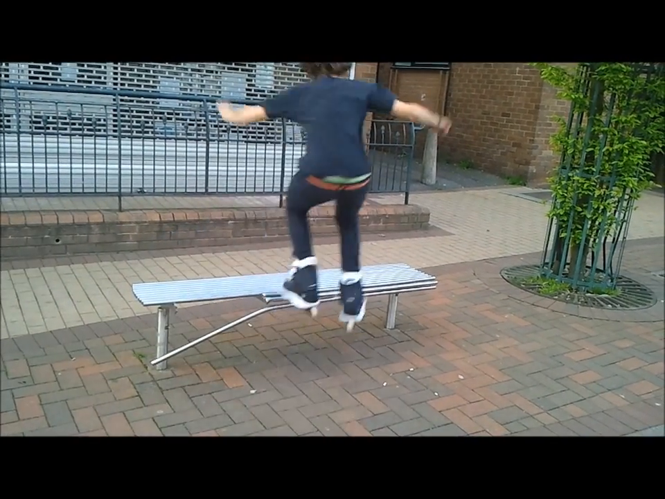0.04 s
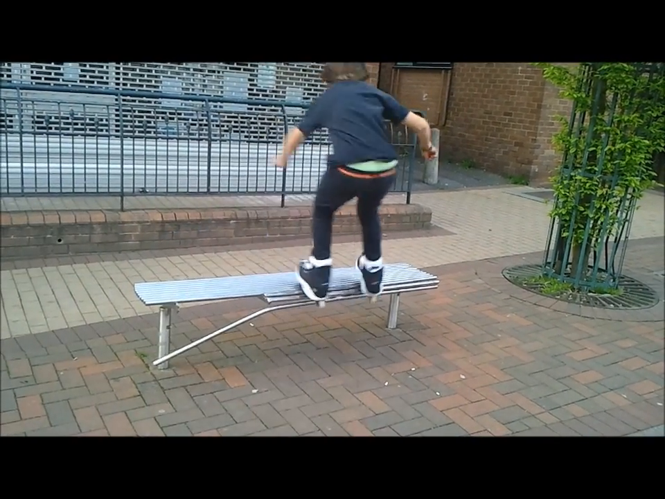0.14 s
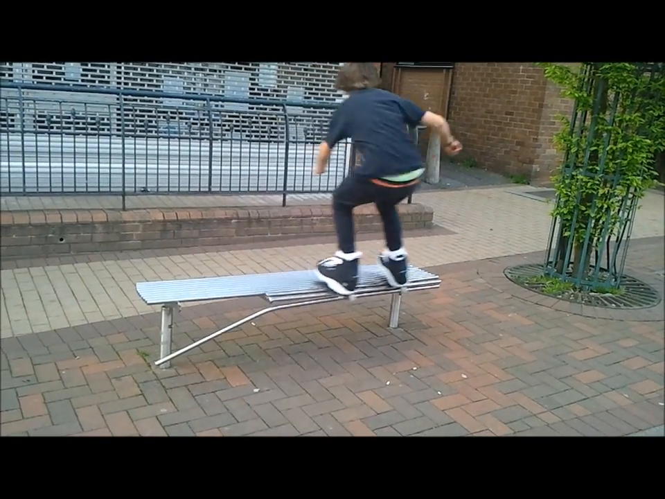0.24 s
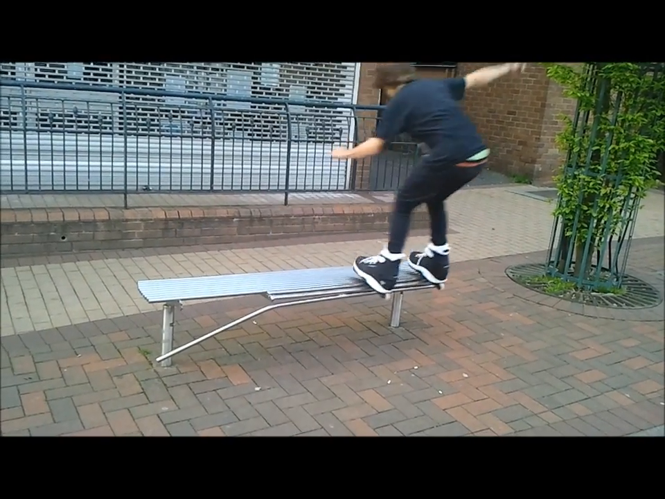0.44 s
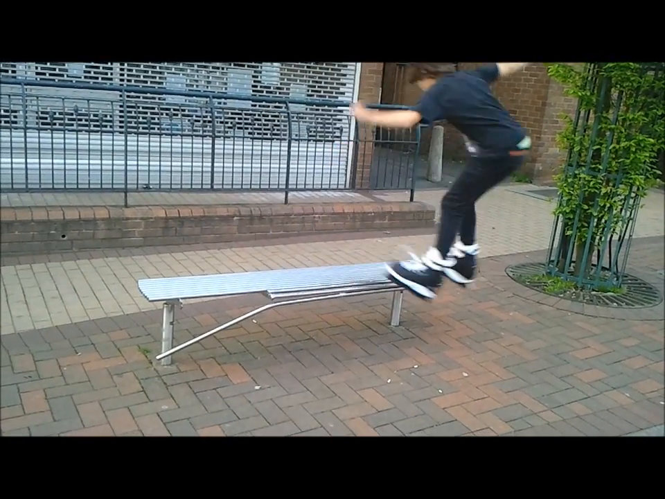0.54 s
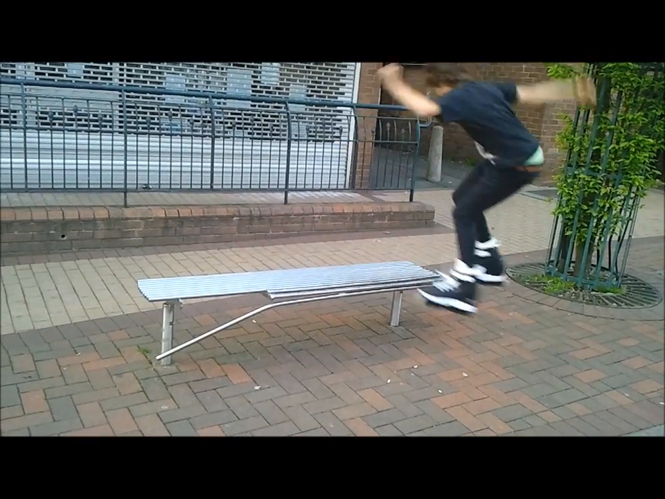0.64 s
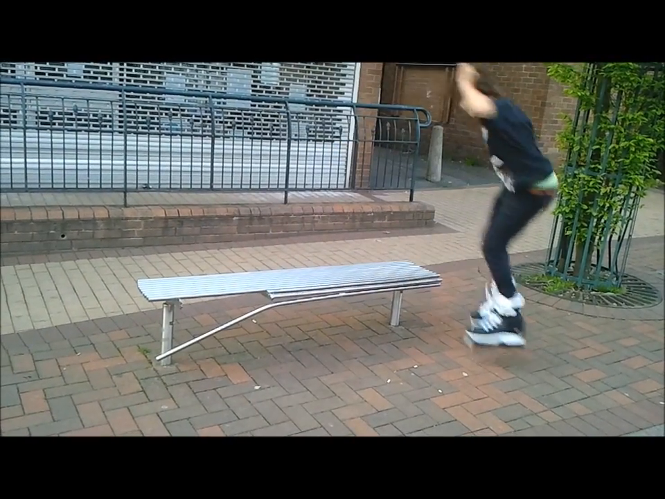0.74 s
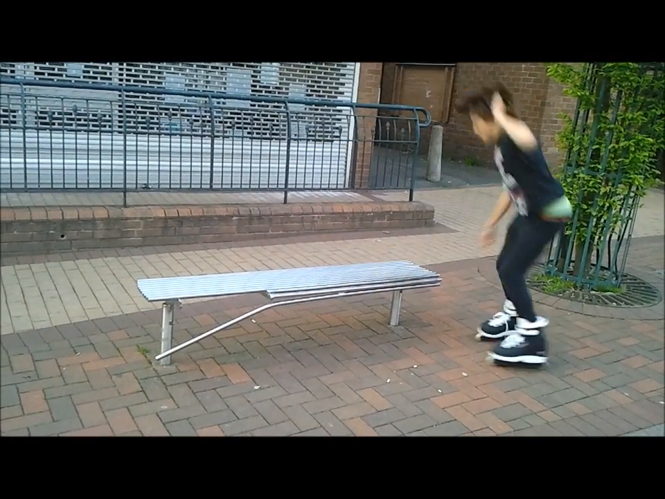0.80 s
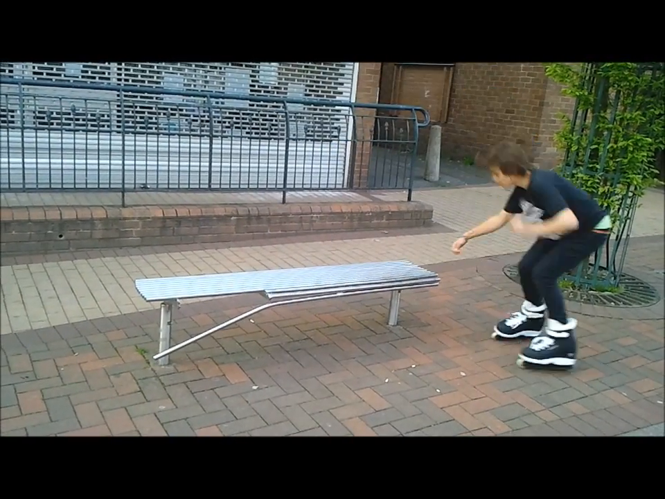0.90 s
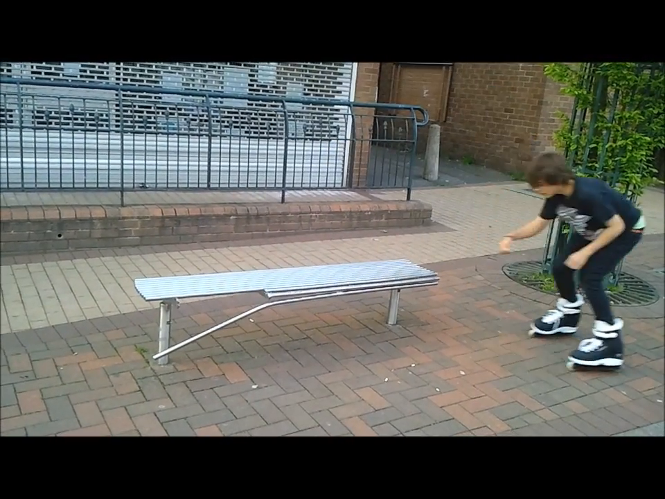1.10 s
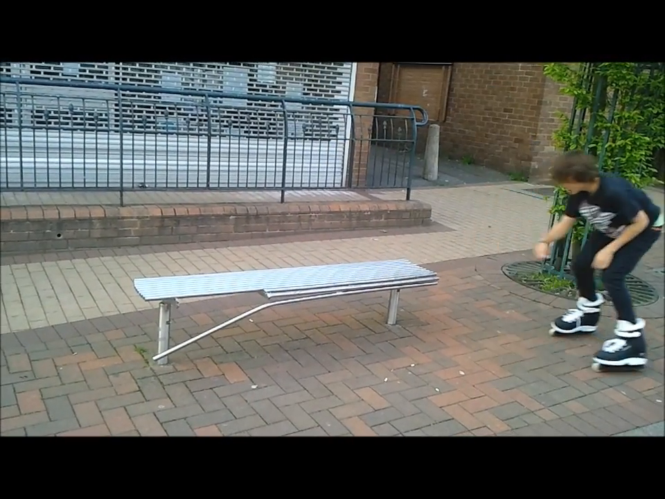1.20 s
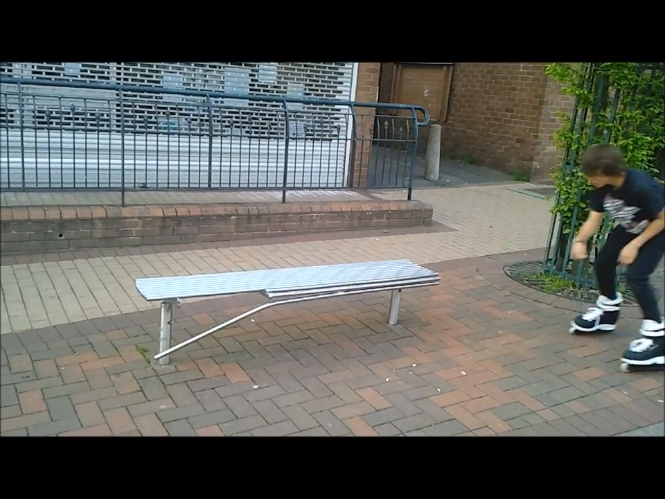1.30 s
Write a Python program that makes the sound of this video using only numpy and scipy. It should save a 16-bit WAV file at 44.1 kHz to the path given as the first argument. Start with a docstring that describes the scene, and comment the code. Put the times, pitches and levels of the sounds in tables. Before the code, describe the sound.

An inline skate grind on a metal bench in a brick yard: faint clicks, a loud ringing clank, a fading scrape, then quick landing thuds and rolling wheels. The blows echo briefly and slightly distort the microphone.

```python
"""An inline skater pushes off with a brief low drone; loose skate parts click in flight.
Both frames slam onto a metal bench and scrape along it by stick-slip; the seat rings and shudders.
Amid soft low bumps the frames snap off its end. The skates land on brick paving in a quick run of
thuds and roll away. Throughout, brick walls echo the blows and scrapes, and the loudest peaks
overload a small microphone."""
import sys
import numpy as np
from scipy import signal
from scipy.fft import rfft, irfft
from scipy.io import wavfile

SR = 44100
rng = np.random.default_rng(int(sys.argv[2]) if len(sys.argv) > 2 else 0)


def generate_wav(sig):
    """Save sig (samples, or channels by samples) to the path in sys.argv[1] as 16-bit PCM at SR."""
    pcm = np.round(np.clip(np.atleast_2d(sig).T, -1, 1) * 32767).astype(np.int16)
    wavfile.write(sys.argv[1], SR, pcm)


N = 59535
T = np.arange(N) / SR

# wheel roar spectrum: freq_hz, gain_db
ROLL_SPECTRUM = [(30, -13.5), (60, -14.5), (110, -6.5), (160, -7), (195, 5), (230, -4.5), (300, 1),
                 (450, -7), (700, -7), (1050, -4.5), (1650, -8), (2150, -21), (3100, -16), (4500, -30.5),
                 (6300, -35.5), (8000, -50.5)]
# wheels on brick, with the yard behind them: time_s, level_db
ROLL_ENVELOPE = [(0, -31), (.2, -35), (.5, -33.5), (.8, -31), (.97, -30), (1.1, -33), (1.22, -33.5),
                 (1.35, -34.5)]
# skate clicks in flight: start_s, level_db
TICK_HITS = [(.030, -29), (.110, -30.5), (.129, -31), (.165, -29)]
# click and snap spectrum: freq_hz, gain_db
SNAP_SPECTRUM = [(100, -18), (650, -14.5), (1150, 2), (1800, -2.5), (2350, 7), (3000, -14), (3700, -9),
                 (4800, -17), (6100, -8), (8000, -24.5)]
# frames striking the seat: start_s, crack_db, knock_db, ring_db, pitch_hz, second_pitch_hz
FRAME_HITS = [(.2211, -6, 1.5, -15.5, 1442, 1915), (.2230, -3, 4, -16, 2334, 2635),
              (0.2344, -15.5, -4, -27, 1470, 2370), (.240, -23, -1, -30.5, 2366, 2435),
              (0.2478, -4.5, 1.5, -19.5, 2733, 3345), (0.265, -15, -6.5, -31, 2570, 1550),
              (0.271, -15, -4.5, -37, 2400, 1200), (0.322, -23, -12.5, -45, 2290, 1193),
              (0.3986, -19, -6.5, -29.5, 1870, 3370)]
# frame crack spectrum: freq_hz, gain_db
FRAME_SPECTRUM = [(80, -27.5), (330, -11.5), (600, -14), (1000, -5), (1450, 1), (1850, -5.5), (2450, -5),
                  (3300, -8.5), (4800, -26.5), (6500, -15), (8000, -45.5)]
# clearest seat modes: pitch_hz, relative_db, unscaled_t60_s
SEAT_MODES = [(255, -9, .8), (386, -6, .6), (585, -9, .6), (836, -9, .6), (1108, -3, .7), (1215, 1, .7),
              (1303, -3, .65), (1445, -2, .6), (1476, -2, .6), (2311, -2, .6), (2348, -3, .55),
              (2545, 0, .65), (2723, -1, .6), (6560, -12, .4)]
# seat plate spectrum: freq_hz, gain_db
PLATE_SPECTRUM = [(80, -15.5), (320, 0), (550, -6), (900, -4.5), (1350, -0.5), (1900, -4), (2500, -2.5),
                  (3400, -3.5), (4300, -10.5), (5300, -21.5), (6500, -20), (8000, -33)]
# metallic zing of the scraping frames: pitch_hz, width_hz, relative_db
ZING_BANDS = [(1150, 90, -11), (2440, 350, -7.5), (6130, 490, -13.5)]
# dull low bumps: start_s, relative_db, pitch_hz
BUMP_HITS = [(0.663, -27, 150), (0.693, -28, 176), (.722, -25, 280), (0.7426, -23, 138), (0.752, -26, 285),
             (.797, -25, 131), (0.8157, -21.5, 95), (0.8187, -17.5, 219), (0.847, -27.5, 130),
             (.855, -19.5, 119)]
# trailing frame's scrape spectrum: freq_hz, gain_db
TRAIL_SPECTRUM = [(100, -15.5), (600, -4), (1150, -1), (1600, 4.5), (2000, -10.5), (2400, -11), (3700, -4),
                  (4600, -26.5), (6000, -22.5), (8000, -42.5)]
# boots and wheels meeting brick: start_s, thud_relative_db, thud_hz, clack_relative_db
LANDING_HITS = [(.870, -9.5, 190, -15), (0.8786, 0.5, 310, -12.5), (0.8832, -9, 240, -14.5),
                (.890, -6.5, 410, -9), (0.8932, -1.5, 284, -15), (0.8973, -11.5, 290, -14),
                (.914, -11.5, 377, -17.5), (.921, -13, 328, -19.5), (.941, -30, 330, -19),
                (.956, -29, 370, -21.5), (0.989, -35, 320, -25.5), (1.071, -24, 280, -49)]
# wheel clack spectrum: freq_hz, gain_db
CLACK_SPECTRUM = [(80, -8.5), (300, 1), (600, 1), (1100, -3), (1650, 1), (2200, -8), (3300, -6.5),
                  (4500, -13.5), (5600, -14), (8000, -34)]
# wall echoes: delay_s, level_db
WALL_ECHOES = [(.014, -15.5), (0.031, -11.5), (.061, -18.5)]

SLIDE_START_S, RELEASE_S = .228, .6893


def amp(db):
    """Decibels to gain."""
    return 10 ** (np.asarray(db) / 20)


def unit(x):
    """Scale to rms 1."""
    return x / np.sqrt(np.mean(x ** 2))


def convolve(x, response):
    """Play x through a response."""
    return signal.fftconvolve(x, response)[:N]


def delay(x, start_s):
    """Start x at start_s."""
    return np.interp(T - start_s, T, x, left=0)


def decay(t60_s):
    """Envelope falling 60 dB in t60_s."""
    return np.exp(-np.log(1000) * T / t60_s)


def low_cut(x, cutoff_hz):
    """Second-order high-pass."""
    return signal.sosfilt(signal.butter(2, cutoff_hz, "high", fs=SR, output="sos"), x)


def resonate(x, pitch_hz, width_hz):
    """One resonance, scaled to rms 1."""
    return unit(signal.lfilter(*signal.iirpeak(pitch_hz, pitch_hz / width_hz, fs=SR), x))


def colour(x, spectrum, size=4096):
    """Minimum-phase filter that keeps the power of white noise."""
    freq_hz, gain_db = np.array(spectrum).T
    bins_hz = np.fft.rfftfreq(size, 1 / SR)
    gain = amp(np.interp(np.log(bins_hz + 1), np.log(freq_hz), gain_db))
    cepstrum = irfft(np.log(unit(gain)))
    cepstrum[1:size // 2] *= 2
    cepstrum[size // 2 + 1:] = 0
    return convolve(x, irfft(np.exp(rfft(cepstrum))))


def burst(spectrum, fade_s, hold_s=0):
    """Rough contact: coloured noise that holds, then dies."""
    envelope = np.exp(-np.maximum(T - hold_s, 0) / fade_s)
    noise = colour(rng.standard_normal(N) * envelope, spectrum)
    return noise * np.sqrt(np.sum(envelope ** 2) / np.sum(noise ** 2))


def wash(t60_s, treble_t60_s, rise_s, split_hz=2500):
    """Dense overlapping modes or echoes; the treble dies first."""
    noise = rng.standard_normal(N)
    low = signal.sosfiltfilt(signal.butter(2, split_hz, fs=SR, output="sos"), noise)
    tail = low * decay(t60_s) + (noise - low) * decay(treble_t60_s)
    return tail * (1 - np.exp(-T / rise_s))


def thud(pitch_hz, fade_s, rise_s=.00047):
    """One heavily damped resonance."""
    return np.sin(2 * np.pi * pitch_hz * T) * np.exp(-T / fade_s) * (1 - np.exp(-T / rise_s))


def rolling(joints_per_s=45, joint_db=1):
    """Wheel roar on brick, made uneven by the joints."""
    unevenness = np.interp(T * joints_per_s, np.arange(N), rng.standard_normal(N))
    level_db = np.interp(T, *np.array(ROLL_ENVELOPE).T) + joint_db * unevenness
    return colour(rng.standard_normal(N) * amp(level_db), ROLL_SPECTRUM)


def takeoff(level_db=-29.5, pitch_hz=93.6, peak_s=.019, width_s=.026):
    """Brief low drone as the wheels push off."""
    swell = np.exp(-((T - peak_s) / width_s) ** 2)
    return amp(level_db) * np.sin(2 * np.pi * pitch_hz * T) * swell


def ticks():
    """Loose skate parts click in the air."""
    return sum(delay(amp(level_db) * burst(SNAP_SPECTRUM, fade_s=.0012), start_s)
               for start_s, level_db in TICK_HITS)


def frame_blow(spectrum, start_s, crack_db, knock_db, ring_db, pitch_hz, second_pitch_hz):
    """A frame hits the seat: it cracks, knocks at two pitches and sets the seat ringing."""
    crack = burst(spectrum, fade_s=.0023, hold_s=.0018)
    knock = thud(pitch_hz, fade_s=.0026) + amp(-4) * thud(second_pitch_hz, fade_s=.0026)
    return delay(amp(crack_db) * crack + amp(knock_db) * knock + amp(ring_db) * seat_ring(), start_s)


def seat_ring(level_db=-5, t60_scale=1.16):
    """Struck seat: clear modes, phased anew by each blow, over a dense plate shimmer."""
    phases = rng.random(len(SEAT_MODES))
    modes = sum(amp(db) * np.sin(2 * np.pi * (hz * T + phase)) * decay(unscaled_t60_s * t60_scale)
                for (hz, db, unscaled_t60_s), phase in zip(SEAT_MODES, phases))
    shimmer = colour(wash(t60_s=.86, treble_t60_s=.82, rise_s=.004), PLATE_SPECTRUM)
    return amp(level_db) * (amp(-1.5) * modes / 2 + shimmer)


def frame_slide(slips_per_s=1800, spread_db=1, impact_db=-14.5, settled_db=-52.5, settle_s=.062):
    """Stick-slip on the seat: hard under the landing weight, light once it settles."""
    slips = (rng.random(N) < slips_per_s / SR) * rng.choice([-1, 1], N)
    slips = slips * amp(spread_db * rng.standard_normal(N))
    scrape = colour(unit(slips), PLATE_SPECTRUM)
    zing = sum(amp(db) * resonate(slips, hz, width_hz) for hz, width_hz, db in ZING_BANDS)
    load = amp(settled_db) + amp(impact_db) * np.exp(-np.maximum(T - SLIDE_START_S, 0) / settle_s)
    on_seat = (T > SLIDE_START_S) & (T < RELEASE_S)
    return (scrape + zing) * load * on_seat


def bench_rumble(level_db=-36, fade_s=.13):
    """The whole bench shudders under the skater's weight."""
    noise = low_cut(rng.standard_normal(N), cutoff_hz=52)
    shudder = resonate(noise, pitch_hz=114, width_hz=52)
    return delay(amp(level_db) * shudder * np.exp(-T / fade_s), SLIDE_START_S)


def bumps():
    """Soft low bumps from the end of the slide until just before the landing."""
    return 2 * sum(delay(amp(db) * thud(hz, fade_s=.0044), start_s) for start_s, db, hz in BUMP_HITS)


def frame_release(trail_db=-27.5):
    """The leading frame snaps off the seat's end; the trailing one scrapes after it."""
    snap = frame_blow(SNAP_SPECTRUM, RELEASE_S, crack_db=-14.5, knock_db=-8, ring_db=-28,
                      pitch_hz=1166, second_pitch_hz=2350)
    trail = amp(trail_db) * burst(TRAIL_SPECTRUM, fade_s=.016, hold_s=.056)
    return snap + delay(trail, RELEASE_S)


def landing(boot_gain_db=3, rattle_db=-12, scuff_db=-19):
    """Boot shells thud, wheels clack on brick, frames rattle, then the wheels scuff into line."""
    hits = np.zeros(N)
    for start_s, thud_db, thud_hz, clack_db in LANDING_HITS:
        boot = amp(thud_db + boot_gain_db) * thud(thud_hz, fade_s=.0043)
        clack = 2 * burst(CLACK_SPECTRUM, fade_s=.0022)
        rattle = amp(rattle_db) * burst(CLACK_SPECTRUM, fade_s=.028)
        hits += delay(boot + amp(clack_db) * (clack + rattle), start_s)
    scuff = amp(scuff_db) * burst(CLACK_SPECTRUM, fade_s=.035, hold_s=.044)
    return low_cut(hits, cutoff_hz=85) + delay(scuff, start_s=.889)


def yard(x, tail_db=-10):
    """Brick walls return a few echoes and a short diffuse tail, with little bass."""
    echoes = sum(amp(level_db) * delay(x, delay_s) for delay_s, level_db in WALL_ECHOES)
    response = wash(t60_s=.92, treble_t60_s=.42, rise_s=.0079)
    tail = convolve(x, response / np.linalg.norm(response))
    return low_cut(echoes + amp(tail_db) * tail, cutoff_hz=260)


def scene():
    """Skates and bench in the yard, mono; the roll and the low sounds stay dry."""
    slam = sum(frame_blow(FRAME_SPECTRUM, *hit) for hit in FRAME_HITS)
    bench = low_cut(slam + frame_release(), cutoff_hz=90)
    skates = bench + frame_slide() + landing() + ticks()
    return (skates + yard(skates) + rolling() + takeoff() + bench_rumble() + bumps())[None]


def record(dry, ceiling=.95, knee=3.86, low_hz=50, top_hz=7450):
    """The microphone flattens the loudest peaks, thins the bass and cuts the top."""
    flattened = dry[0] / (1 + np.abs(dry[0] / ceiling) ** knee) ** (1 / knee)
    low_pass = signal.firwin(161, top_hz, window=("kaiser", 7), fs=SR)
    return signal.fftconvolve(low_cut(flattened, low_hz), low_pass, "same")[None]


dry = scene()
out = record(dry)
generate_wav(out)
```